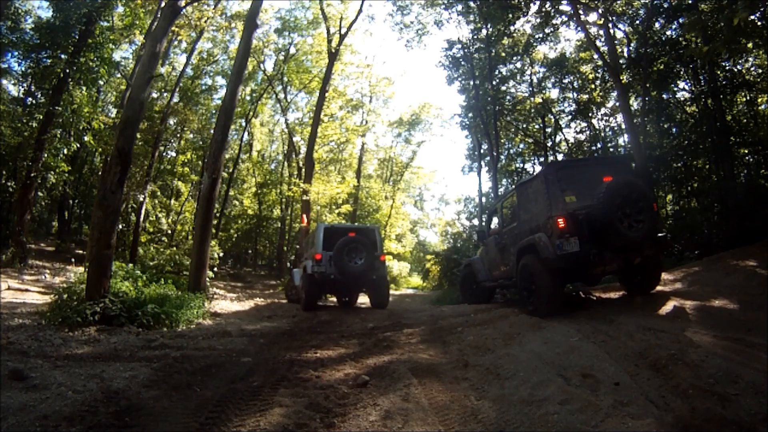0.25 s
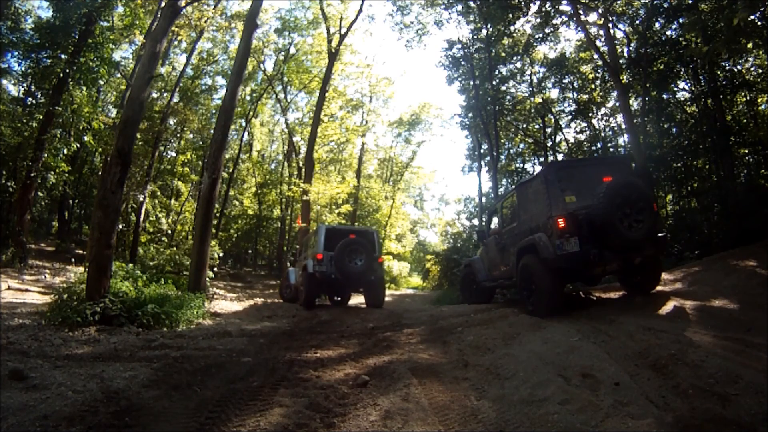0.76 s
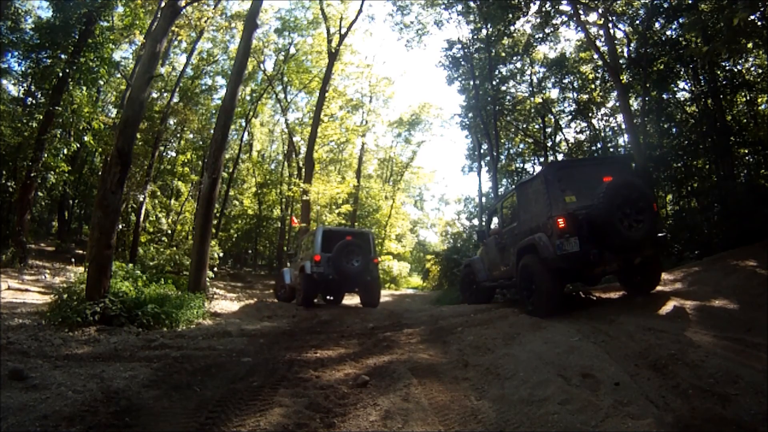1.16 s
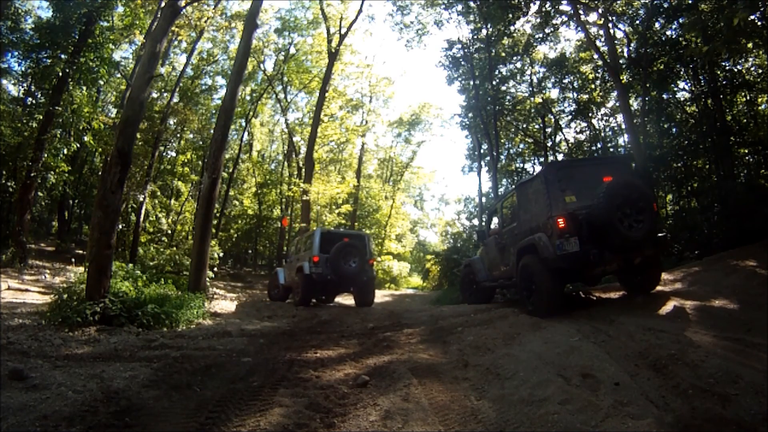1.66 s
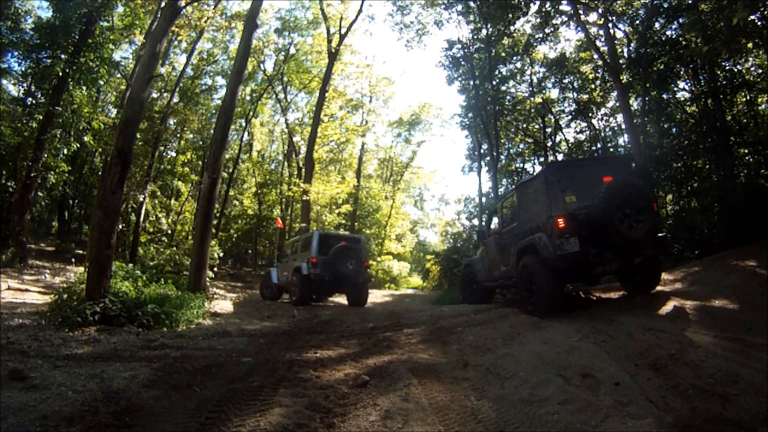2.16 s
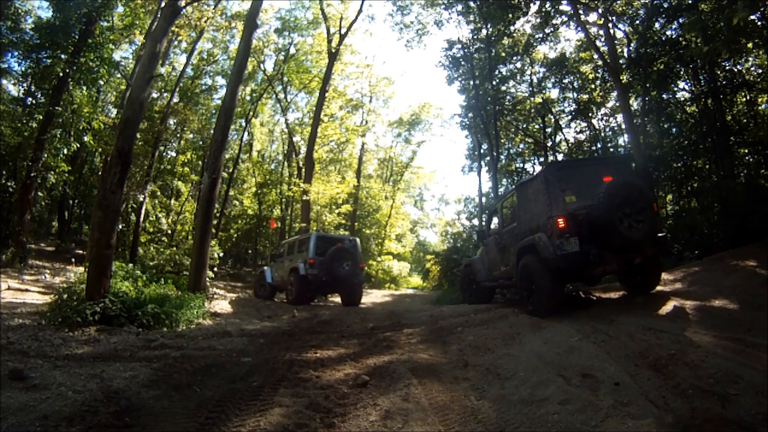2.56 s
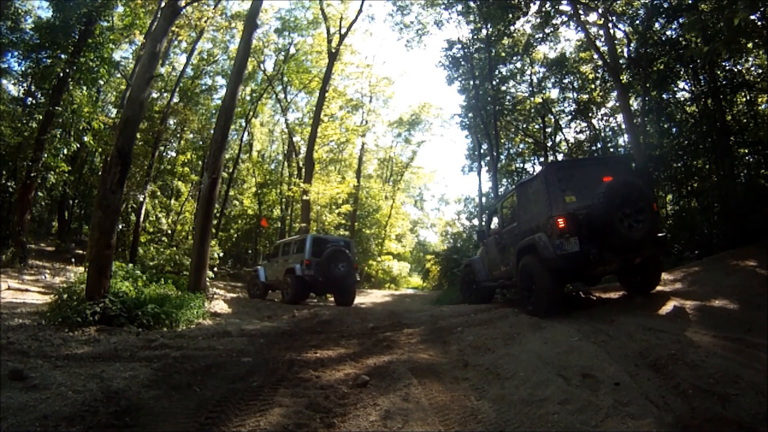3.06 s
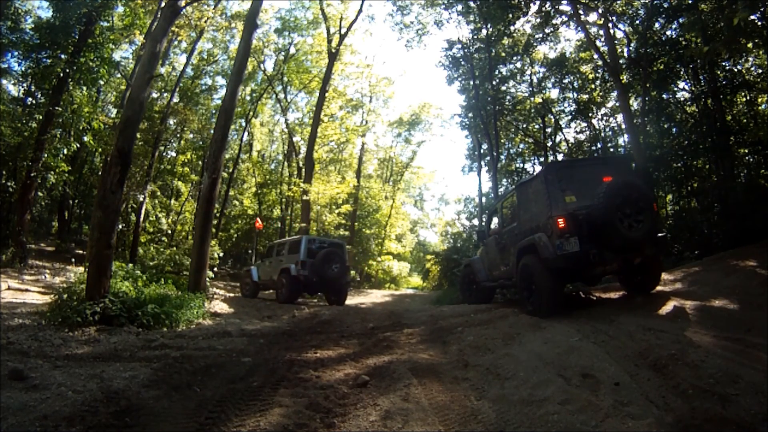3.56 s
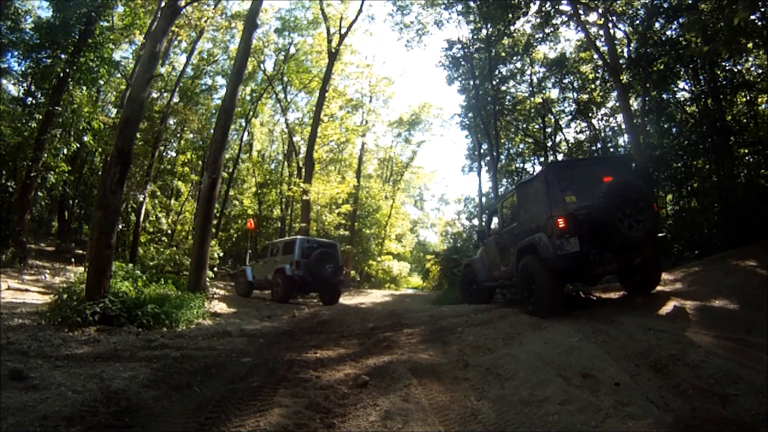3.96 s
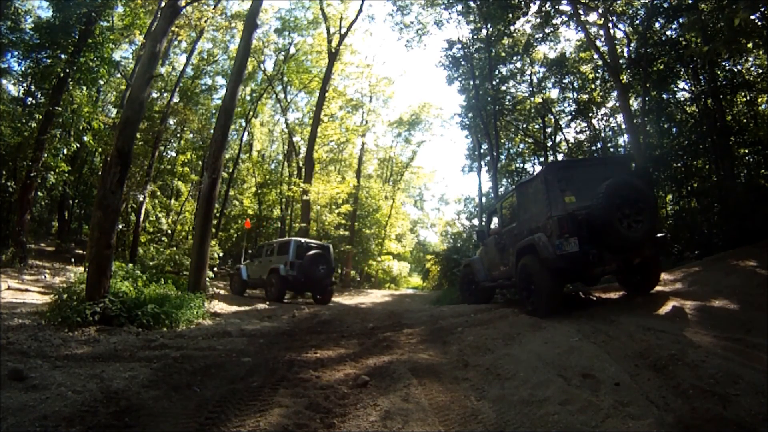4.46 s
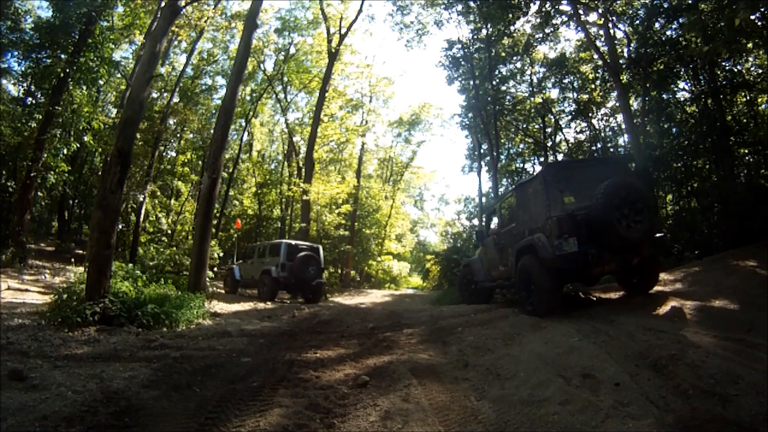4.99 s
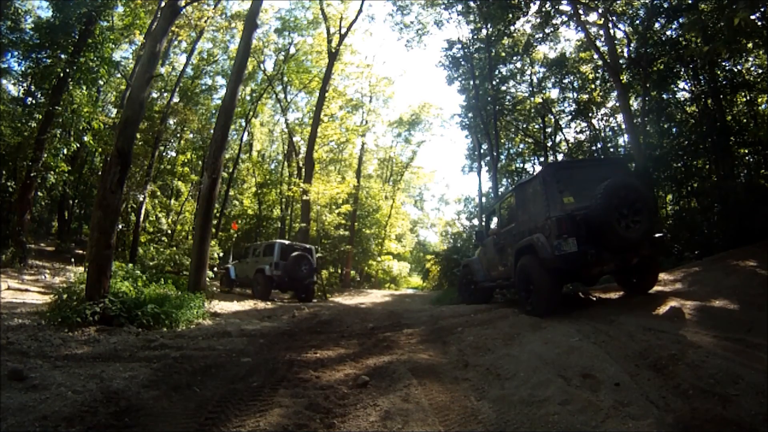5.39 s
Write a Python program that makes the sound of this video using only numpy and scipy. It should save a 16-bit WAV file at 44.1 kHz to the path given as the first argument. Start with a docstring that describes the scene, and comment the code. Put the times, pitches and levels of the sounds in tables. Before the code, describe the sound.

A six-cylinder off-roader creeps along a wooded dirt trail, heard from a microphone fixed to its body. A steady low engine hum throbs under airy fan whir and faint belt whistle. Deep booming swells and fades unevenly as the body rocks. Thumps land near one, three, three and a half and four and a half seconds, the one at three with the clearest panel knock.

```python
"""Off-roader idling along a dirt trail

A six-cylinder off-roader creeps over rough ground at idle, heard from a microphone fixed to its body.
The engine is summed from wavering orders and ticks with resonated impulses; fan and belt are
resonated noise over a steady rush. The body booms unevenly near 66 Hz, and bumps add thumps, panel
knocks, rattles and grit. Slow sampling with held steps adds a thin metallic sheen."""
import sys
import numpy as np
from scipy import signal
from scipy.fft import rfft, irfft
from scipy.io import wavfile
from scipy.ndimage import uniform_filter1d

SR = 44100
rng = np.random.default_rng(int(sys.argv[2]) if len(sys.argv) > 2 else 0)


def wrap_up_sound(samples):
    """Save the sound to the file named by the first command line argument, as 16-bit audio."""
    columns = np.atleast_2d(samples).T
    # keep every value between -1 and 1, then stretch to whole-number steps
    tamed = np.clip(columns, -1, 1)
    steps = np.round(tamed * 32767).astype(np.int16)
    wavfile.write(sys.argv[1], SR, steps)


N = 248283

# Bumps in the trail: start_s, boom_db (before the jolt's shape), driven_s (time the body is pushed),
# boom_t60_s, knock_db (before the knock's shape), grit_grains_per_s (at the start; zero or below: none)
BUMPS = [(0.246, -27.5, 0.093, .15, -45, 0), (.845, -16.5, 0.067, 0.23, -30.5, 300),
         (.965, -24.5, 0.041, 0.11, -40, 0), (1.235, -25, 0.043, .2, -39, 0),
         (1.75, -27.5, 0.058, 0.13, -43, 0), (2.8, -26, .055, 0.2, -37, -2),
         (2.974, -15.5, 0.044, .38, -23.5, 40), (3.632, -18, 0.041, .1, -35, 60),
         (3.678, -17.5, .035, 0.12, -27.5, 0), (4.5, -18.5, 0.0646, 0.053, -32, 30),
         (4.613, -25.5, 0.071, 0.52, -48, 0), (5.25, -26, 0.036, 0.089, -38, -5)]


def undb(db):
    """Decibels to gain."""
    return 10 ** (np.asarray(db) / 20)


def unit(x):
    """Scale to rms 1."""
    return x / np.sqrt(np.mean(x ** 2))


def since(start_s):
    """Seconds since a moment, zero before it."""
    return np.maximum(np.arange(N) / SR - start_s, 0)


def curve(rows):
    """Each column of a time table, interpolated sample by sample."""
    times_s, *columns = np.transpose(rows)
    return [np.interp(np.arange(N) / SR, times_s, column) for column in columns]


def walk(rate_hz):
    """Slow chance: random levels, rate_hz of them a second, joined by ramps; spread near 1."""
    step = int(SR / rate_hz)
    levels = np.repeat(rng.standard_normal(N // step + 1), step)
    return 1.183 * uniform_filter1d(levels, step)[:N]


def colour(x, points):
    """Give a white signal of rms 1 a spectrum of (Hz, dB per Hz) points, joined along log frequency."""
    hz, db = np.transpose(points)
    bins_hz = np.maximum(np.arange(N + 1) * SR / (2 * N), 1)
    gain = undb(np.interp(np.log(bins_hz), np.log(hz), db))
    # white noise of rms 1 spreads its power over SR / 2
    return irfft(rfft(x, 2 * N) * gain)[:N] * np.sqrt(SR / 2)


def resonate(x, hz, width_hz):
    """A resonance applied twice, for steep flanks; the width is that of one pass."""
    b, a = signal.iirpeak(hz, hz / width_hz, fs=SR)
    once = signal.lfilter(b, a, x)
    return signal.lfilter(b, a, once)


def blown(modes):
    """Resonances (Hz, width Hz, dB), each stirred by its own turbulence; the sum has rms 1."""
    return unit(sum(undb(db) * resonate(rng.standard_normal(N), hz, width_hz)
                    for hz, width_hz, db in modes))


def firings(cycle, scatter_db, jitter_s, count=6):
    """One impulse per cylinder and cycle, each of its own strength and slightly off the beat."""
    at = np.flatnonzero(np.diff(np.floor(cycle * count)))
    size, late = np.clip(rng.standard_normal((len(at), 2)), -3, 1.4).T
    late_samples = (late * jitter_s * SR).astype(int)
    pulses = np.zeros(N)
    pulses[np.clip(at + late_samples, 0, N - 1)] = undb(scatter_db * size)
    return pulses


def engine_bay(whir_waver_db=0.75, whistle_db=-51.5, flutter_db=0.6):
    """Fan and belt drive sing as turbulence stirs their resonances, over a steady rush of air and tyres."""
    # engine bay resonances that the fan excites: centre_hz, width_hz, relative_db
    whir_modes = [(522, 19.5, -14.5), (782.7, 49, -8.5), (856.3, 47, -6), (990, 20, -34), (1074.8, 36, 0),
                  (1142.6, 95, -0.5), (1241, 63, -2), (1279, 23, -7.5), (1358.3, 40.5, -1),
                  (1659, 41, -15.5), (1898, 39, -20.5), (2222, 140, -13.5), (2404, 91, -14)]
    # belt whistle: centre_hz, width_hz, relative_db
    whistle_modes = [(2791, 57, -8.5), (2846, 47.5, -3.5)]
    # cooling fan: time_s, whir_db (rms before its waver)
    fan_level = [(0, -45), (3.4, -46), (5.63, -43.5)]
    # rush of air and tyres: frequency_hz, density_db_per_hz (before its flutter)
    rush_spectrum = [(100, -115), (420, -85), (560, -83), (690, -85), (900, -82), (1440, -82.5),
                     (1540, -90), (1900, -90.5), (2080, -83.5), (2720, -85.5), (3000, -95.5), (3250, -100),
                     (3700, -93), (5000, -106), (6000, -107)]
    whir = blown(whir_modes) * undb(curve(fan_level)[0] + whir_waver_db * walk(7.9))
    whistle = blown(whistle_modes) * undb(whistle_db)
    rush = colour(rng.standard_normal(N), rush_spectrum) * undb(flutter_db * walk(12))
    return whir + whistle + rush


def ticks(cycle, tick_hz=4600.0, tick_db=-70., second_db=-9.0):
    """Faint resonated ticks in step with the engine: one per firing and a weaker one in between."""
    first = firings(cycle, scatter_db=3., jitter_s=.0004)
    second = firings(cycle + .07, scatter_db=3.5, jitter_s=.0015)
    clicks = resonate(first + undb(second_db) * second, tick_hz, width_hz=1150.)
    return unit(clicks) * undb(tick_db)


def panels(cycle, throb=0.67, count=6):
    """Body panels shudder: coloured noise that swells once per firing."""
    # panels shaken by the firings: frequency_hz, density_db_per_hz (before the drivetrain load)
    panel_spectrum = [(15, -100), (30, -68), (48, -61.5), (84, -60), (104, -80), (162, -69), (181, -79.5),
                      (202, -79.5), (222, -63.5), (243, -63.5), (264, -68), (322, -72.5), (378, -76),
                      (420, -98.5), (700, -115)]
    push = 1 + throb * np.cos(2 * np.pi * count * cycle)
    return colour(unit(push * rng.standard_normal(N)), panel_spectrum)


def grit(hz=4330.0, width_hz=1800.0, grain_db=-20.5, fade_s=.03):
    """Some bumps throw grit against the underbody: random impulses, quickly thinning out, resonated."""
    rate = sum(per_s * (since(start_s) > 0) * np.exp(-since(start_s) / fade_s)
               for start_s, *_, per_s in BUMPS)
    grains = (rng.random(N) < rate / SR) * rng.uniform(0.7, 1, N)
    return undb(grain_db) * resonate(grains, hz, width_hz)


def jolts(rise_s=0.01):
    """How hard each bump shakes the body, 0-1: a quick rise, a short push, then a ring-out."""
    shakes = []
    for start_s, _, driven_s, t60_s, *_ in BUMPS:
        t = since(start_s)
        rise = 1 - np.exp(-(t / rise_s) ** 2)
        ring_out = np.exp(-np.log(1000) * np.maximum(t - driven_s, 0) / t60_s)
        shakes.append(rise * ring_out)
    return np.array(shakes)


def knocks(shakes, knock_hz=233.8, knock_t60_s=0.21, rattle_hz=228.0, rattle_width_hz=74.0, rattle_db=-13):
    """As a wheel drops into a rut, a panel rings as a decaying sine and loose trim rattles as noise."""
    out = np.zeros(N)
    # rattle_db is relative to the knock that shakes the trim
    rattle = undb(rattle_db) * unit(resonate(rng.standard_normal(N), rattle_hz, rattle_width_hz))
    for (start_s, _, _, _, knock_db, _), shake in zip(BUMPS, shakes):
        t = since(start_s)
        # the strike ramps up over one period, then dies away
        strike = np.minimum(t * knock_hz, 1) * np.exp(-np.log(1000) * t / knock_t60_s)
        knock = strike * np.sin(2 * np.pi * knock_hz * t)
        out += undb(knock_db) * (knock + shake * rattle)
    return out


def boom(shakes, hz=66.16, sway_width_hz=20.4, evenness=0.63, body_hz=66.5, body_width_hz=53.0):
    """The lowest body resonance: rough ground rocks it unevenly, a bump makes it ring loud and true."""
    # roughness of the trail under the wheels: time_s, rocking_db (before the body resonance)
    trail = [(0, -31), (.45, -35.5), (.6, -46), (.8, -39), (1.1, -28.5), (1.35, -35), (2.0, -32),
             (2.2, -36.5), (2.55, -40.5), (3.1, -31), (3.5, -35.5), (4.2, -36), (4.85, -28), (4.98, -52),
             (5.63, -35.5)]
    sway = signal.hilbert(resonate(rng.standard_normal(N), hz, sway_width_hz))
    # the dampers even out the swells; the trail sets their average strength
    swell = np.abs(sway) ** np.clip(1 - evenness, 0, 1)
    swell = swell / np.sqrt(uniform_filter1d(swell ** 2, size=SR // 6))
    rocking = np.sqrt(2) * undb(curve(trail)[0]) * swell * np.cos(np.angle(sway))
    thumps = sum(undb(boom_db) * shake * np.sin(2 * np.pi * hz * since(start_s))
                 for (start_s, boom_db, *_), shake in zip(BUMPS, shakes))
    # the body's inertia rounds each swell; a bump takes over from the rocking
    rounded = resonate(rocking, body_hz, body_width_hz)
    return rounded * (1 - shakes.max(axis=0)) + thumps


def hum(cycle, waver_db=1.24, slip_rad=0.16):
    """Engine orders as sines; uneven combustion makes each waver in level and phase."""
    # engine hum: multiple of the cycle rate, level_db (rms before its waver)
    orders = [(6, -47), (7, -58), (10, -43), (11, -42), (12, -53), (18, -47.5), (19, -51), (24, -53.5),
              (26, -53.5), (30, -58.5), (33, -46), (36, -54), (39, -60.5), (42, -61), (48, -52.5),
              (52, -59)]
    total = 0
    for order, db in orders:
        level = undb(db + waver_db * walk(10))
        phase = 2 * np.pi * (round(order) * cycle + rng.random()) + slip_rad * walk(7.8)
        total = total + level * np.sin(phase)
    return np.sqrt(2) * total


def scene():
    """All parts of the vehicle, turning with one crankshaft and shaken by the same bumps."""
    # engine speed: time_s, four-stroke cycle_rate_hz (before a slight random drift)
    speed = [(0, 6.48), (1.1, 6.53), (2.25, 6.5), (3.0, 6.55), (3.5, 6.52), (5.63, 6.53)]
    # load on the drivetrain: time_s, panel_shudder_db
    load = [(0, 2), (1.2, 1.5), (2.4, 0.5), (3.4, 1.5), (4.3, -1), (5.63, -0.5)]
    cycle = np.cumsum(curve(speed)[0] * (1 + .002 * walk(6))) / SR
    shakes = jolts()
    shudder = panels(cycle) * undb(curve(load)[0])
    body = shudder + grit() + knocks(shakes) + boom(shakes)
    return (engine_bay() + ticks(cycle) + body + hum(cycle))[None]


def record(dry, hold_hz=12000, top_hz=15200):
    """Each slow sample is held four steps, which mirrors the sound faintly into the treble; then the top is cut."""
    slow = signal.resample_poly(dry, hold_hz, SR, axis=1)
    slow = signal.sosfilt(signal.butter(2, 5830, fs=hold_hz, output="sos"), slow)
    steps = np.repeat(slow, 4, axis=1)
    held = signal.resample_poly(steps, SR, 4 * hold_hz, axis=1)[:, :N]
    return signal.sosfilt(signal.ellip(10, .2, 80, top_hz, fs=SR, output="sos"), held)


dry = scene()
out = record(dry)
wrap_up_sound(out)
```